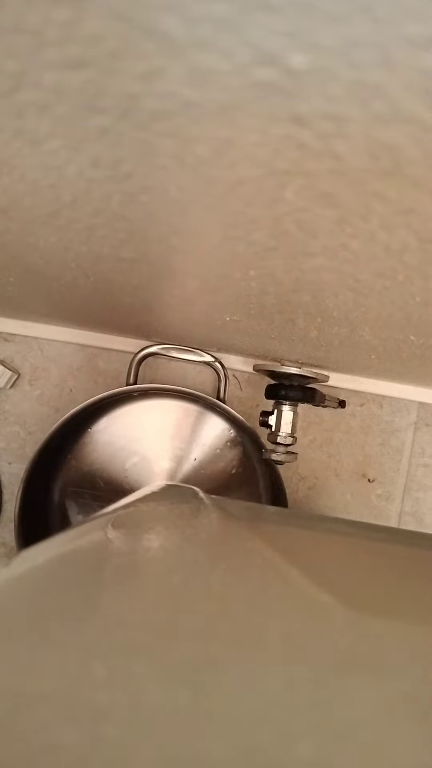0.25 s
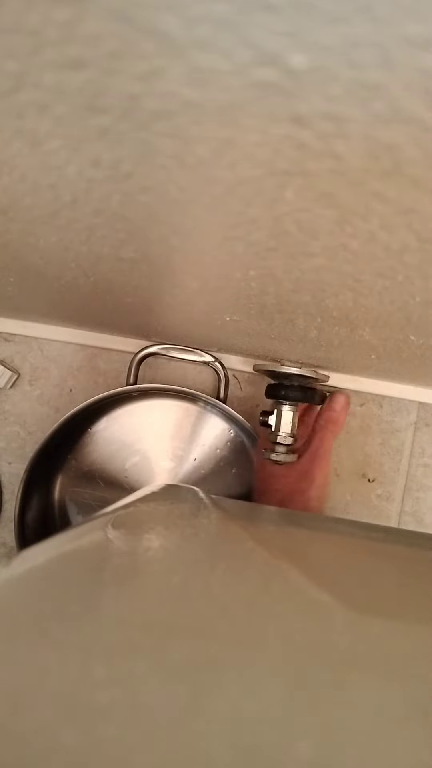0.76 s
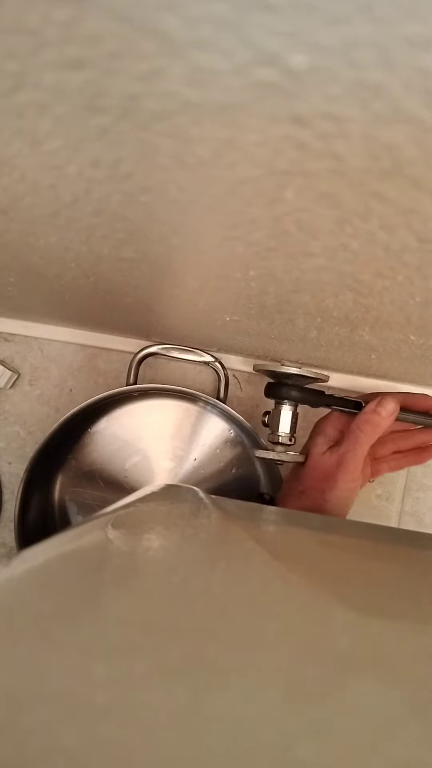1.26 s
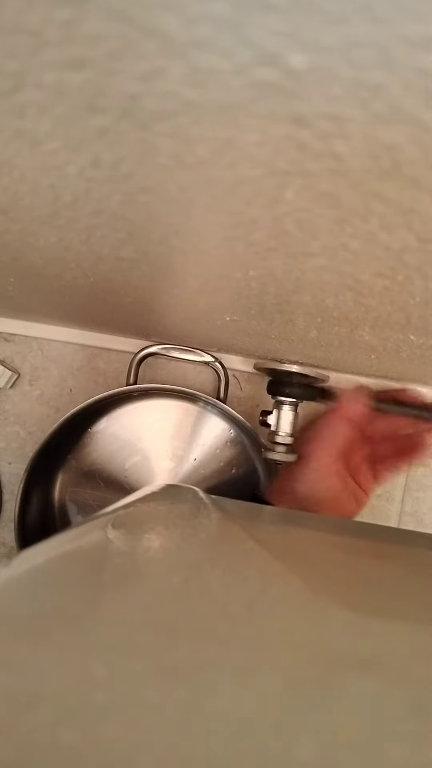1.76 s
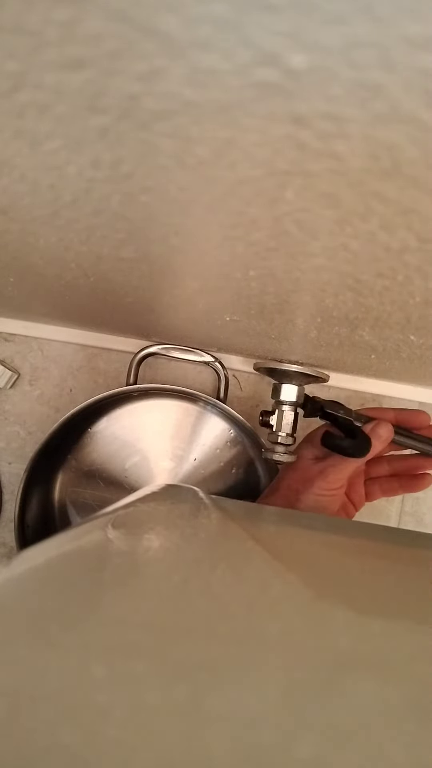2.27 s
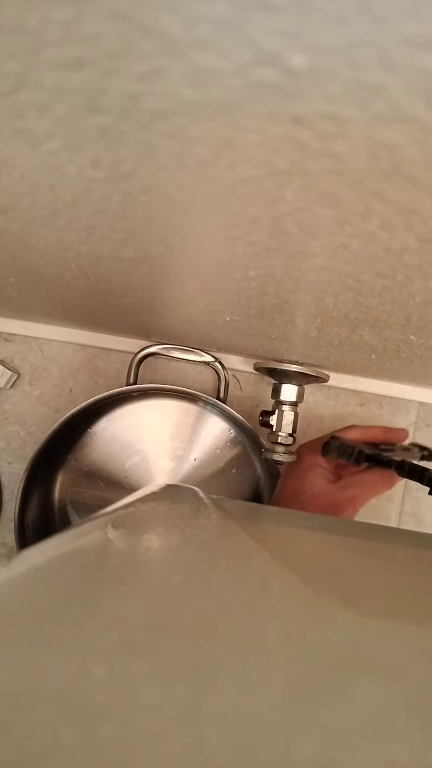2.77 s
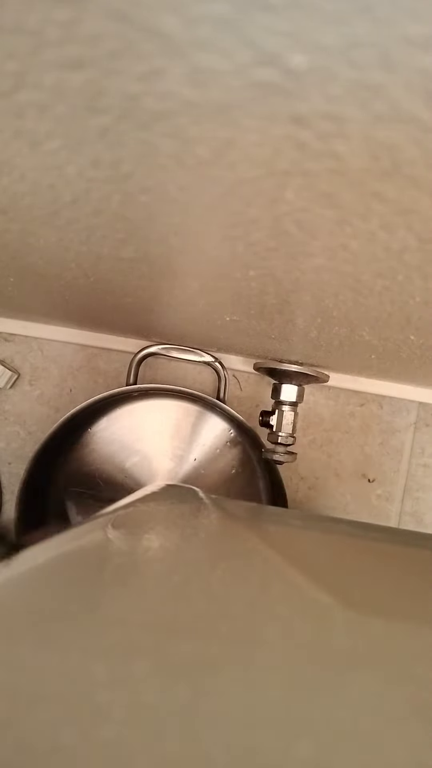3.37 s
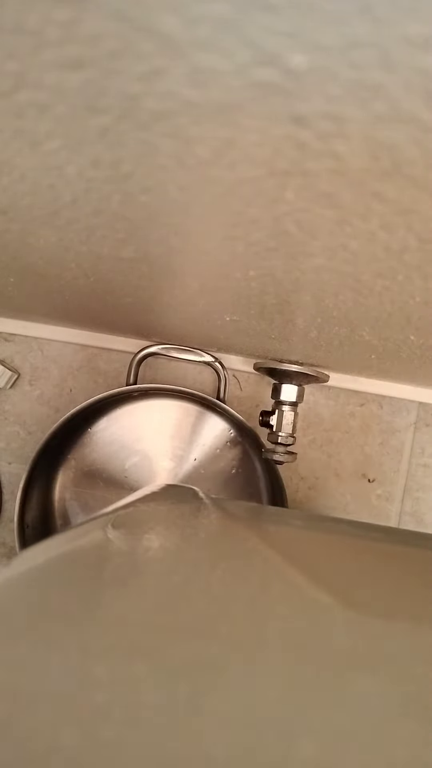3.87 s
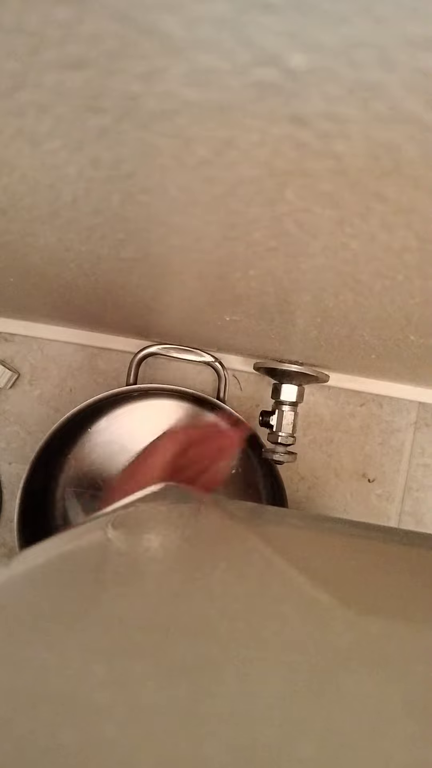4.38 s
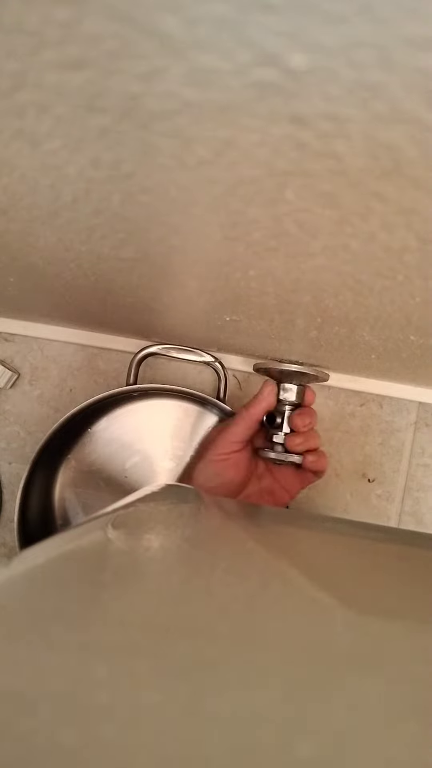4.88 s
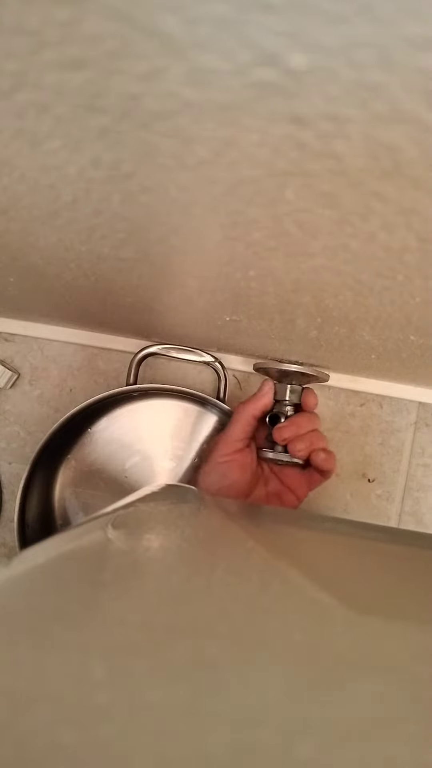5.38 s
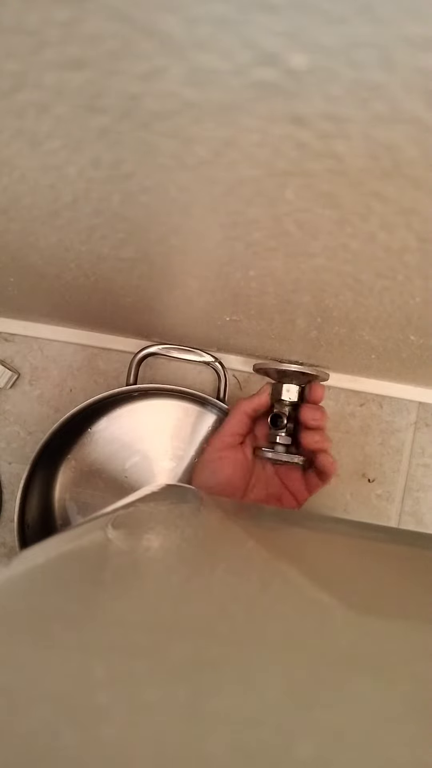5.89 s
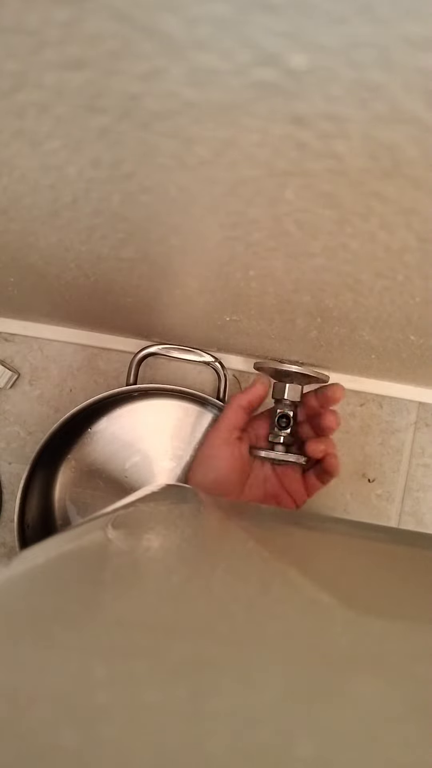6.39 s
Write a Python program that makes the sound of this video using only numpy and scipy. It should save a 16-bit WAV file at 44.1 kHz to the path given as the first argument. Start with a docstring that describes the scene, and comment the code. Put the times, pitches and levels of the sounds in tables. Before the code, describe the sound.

Sparse metal clicks and dull bumps in a small hard room, a loud jumbled clatter of a tool put down, then quiet gritty scrapes.

```python
"""A steel wrench clicks, chatters and knocks on a water valve beside a wall and is laid down among other things.
Each contact is a burst of shaped noise, plus decaying tones of the steel and of the boards and pot it knocks.
All along, dull bumps boom through wall and floor as fading tones and resonant noise; near the end a hand turns
the valve, and gritty noise and thin tones scrape the thread. The echoes of a small hard room are in each blow's
dying away and wavering. Behind it all, a hush of shaped noise swells and sinks."""
import sys
import numpy as np
from scipy import signal
from scipy.fft import rfft, irfft, next_fast_len
from scipy.io import wavfile
from scipy.ndimage import uniform_filter1d, map_coordinates

SR = 44100
rng = np.random.default_rng(int(sys.argv[2]) if len(sys.argv) > 2 else 0)


def store_wav(level_fs):
    """Save 16-bit WAV to argv[1]."""
    pcm = np.round(np.clip(np.atleast_2d(level_fs), -1, 1) * 32767)
    wavfile.write(sys.argv[1], SR, pcm.T.astype(np.int16))


N = 292824  # length [samples]

# A "ring time" is the time a sound takes to fall by 60 dB.
# Background hush, in two stretches: (time [s], hiss level [dB], low rush level [dB])
HUSH_LEVELS = [
    [(0.15, -51.5, -56.5), (0.76, -51, -56), (0.87, -51.5, -58), (0.98, -56.5, -61), (1.16, -59.5, -68),
     (1.4, -57.5, -73), (1.52, -57, -64), (1.79, -54, -61), (1.92, -60, -67), (2.04, -64, -71),
     (2.25, -64.5, -76.5), (2.77, -60.5, -70.5), (3.11, -54.5, -61.5), (3.78, -50.5, -53)],
    [(4.55, -52.5, -65), (4.69, -53, -58), (4.83, -55, -65), (4.97, -60.5, -74), (5.19, -65.5, -79),
     (5.41, -60.5, -70), (5.54, -55.5, -71.5), (5.67, -63, -80), (5.87, -67, -77), (6.2, -55.5, -71.5),
     (6.3, -60, -79), (6.38, -63, -73), (6.49, -68.5, -76), (6.64, -65.5, -79)],
]
# Wavering narrow hum, in two stretches: (time [s], level [dB])
HUM_LEVELS = [
    [(0.15, -64), (0.33, -60), (0.59, -47), (1.28, -73.5), (2.07, -48), (2.31, -62.5), (3.0, -60),
     (3.33, -75.5), (3.65, -53.5), (3.78, -59)],
    [(4.6, -63.5), (4.72, -65), (4.91, -55), (5.35, -45), (5.57, -64.5), (5.71, -52), (5.88, -78.5),
     (6.3, -58), (6.5, -78.5), (6.64, -83)],
]
# Tone color of the hiss: (frequency [Hz], level [dB])
HISS_SPECTRUM = [(180, -24.5), (300, -11), (327, -9.5), (443, -6.5), (559, -12.5), (725, -11), (1030, -12),
                 (1780, -13), (2270, -10), (2820, -11.5), (6910, -16.5), (9500, -35.5), (12400, -62),
                 (20900, -120)]
# Tone color of the faint treble over the hiss: (frequency [Hz], level [dB])
AIR_SPECTRUM = [(4710, -25.5), (8000, -8.5), (9420, -13.5), (10900, -1), (15100, -5.5), (16200, -3),
                (16500, -44.5)]
# Tone color of the deep rumble: (frequency [Hz], level [dB])
RUMBLE_SPECTRUM = [(12, -47.5), (20, -17.5), (101, -7.5), (259, -32.5), (295, -15.5), (325, -14.5),
                   (414, -15), (600, -39.5), (780, -71), (1320, -120)]
# How alike left and right are: (frequency [Hz], likeness [-1 to 1])
STEREO_LIKENESS = [(60, 0.78), (200, .9), (400, .75), (700, 0.62), (1400, 0.062), (4000, 0.14),
                   (12000, -0.048)]
# How the sound leans to one side: (frequency [Hz], left minus right [dB])
STEREO_LEAN = [(60, -0.5), (150, 2.5), (380, 4), (950, 3.5), (2380, 1.5), (5980, -3), (15000, 1)]
# Resonances of wall and floor: (frequency [Hz], width [Hz], level [dB])
WALL_RESONANCES = [(60, 39, -5), (97.4, 48, 0.5), (190, 26, -2), (221, 10, 4), (301.2, 14, -2),
                   (417, 49, -8.5)]
# Dull bumps: (time [s], strength [dB], pitch [Hz])
BUMP_EVENTS = [(0.002, -21, 240), (0.518, -28.5, 167), (0.547, -15.5, 89), (0.619, -29.5, 312),
               (0.688, -23.5, 194.4), (0.758, -26, 197), (0.892, -19.5, 236.5), (0.926, -14.5, 93),
               (1.056, -25.5, 115.4), (1.337, -22, 97), (1.4, -24, 180.5), (1.595, -32, 204),
               (1.687, -25, 178), (1.826, -17.5, 307), (1.849, -5.5, 99.4), (1.878, -8, 98),
               (2.068, -21, 116), (2.133, -12, 187.4), (2.925, -19, 201), (2.976, -17, 189),
               (3.018, -39, 291), (3.82, -12, 224.4), (3.849, -14, 235), (4.146, -9, 333), (4.21, -11, 228),
               (4.301, -22, 218), (4.589, -30.5, 114), (4.841, -31, 221), (5.006, -36.5, 166.3),
               (5.166, -17.5, 157), (5.178, -18, 165.6), (5.219, -29, 160), (5.49, -33, 190),
               (5.522, -25.5, 160), (5.629, -36, 92.4), (5.669, -43.5, 200.6), (5.86, -28, 116),
               (5.948, -37, 202.5), (6.067, -28, 213), (6.149, -17, 99.3), (6.183, -36, 77),
               (6.33, -27.5, 115.5), (6.37, -32, 173), (6.456, -34.5, 127)]
# Resonances of the turning thread: (frequency [Hz], width [Hz], level [dB])
THREAD_RESONANCES = [(1000, 60, -9), (2120, 120, -4), (3100, 400, -2), (3990, 30, -9), (4850, 60, -1),
                     (6650, 70, -6), (7600, 600, 2), (12300, 500, -2), (14900, 1500, 3)]
# Scraping turns: (time of full force [s], scrape level [dB], grip rise [dB per s], hold [s],
#                  whistle time [s], whistle level [dB])
SCRAPING_TURNS = [(5.875, -47, 232, 0.024, 5.878, -54), (6.411, -48.5, 900, 0.067, 6.462, -51.5)]
# Ringing tones of wrench and valve: (frequency [Hz], level [dB], ring time [s])
STEEL_MODES = [(1000, -3, .13), (1300, -3, .15), (1545, -3, .13), (1900, -2, .22), (2130, -3, .17),
               (2350, -2, .17), (2570, 0, .18), (2780, -3, .17), (3420, -2, .16), (3690, 0, .22),
               (3830, 0, .25), (3990, -2, .22), (4320, -2, .18), (4630, 0, .25), (4850, -4, .18),
               (5380, -1, .2), (6350, -5, .17), (6810, -4, .19)]
# Tones of the boards and pot that the blows knock: (frequency [Hz], level [dB], ring time before scaling [s])
BOARD_MODES = [(103, 2.5, .3), (169.6, -1, 0.92), (245.6, -1, 0.77), (289, -13.5, 0.13), (351.6, 6.5, 0.36),
               (369, -1, .2), (417, 1, 0.08), (470.2, -6.5, 0.28), (508.5, -2.5, 0.37), (593.5, -3.5, 0.32),
               (646, -2, .3), (705, -2, 0.32), (757.5, -0.5, 0.18), (833, -3, 0.25), (945, -12.5, 0.39)]
# Tone color of the clatter: (frequency [Hz], level [dB])
CLATTER_SPECTRUM = [(240, -23.5), (400, -10), (482, -1), (1320, -9), (1650, -10.5), (2490, -12),
                    (3120, -11), (3610, -16), (7190, -16.5), (9500, -32), (12400, -86), (20900, -120)]
# Tone color of the clatter's highest part: (frequency [Hz], level [dB])
TOP_SPECTRUM = [(5000, -42.5), (8500, -4.5), (10300, -3), (12500, 1), (13600, -6), (15000, 2),
                (15900, -16.5), (16500, -28.5)]
# How fast the clatter dies at each pitch: (frequency [Hz], share of its ring time [ratio])
CLATTER_DYING = [(400, 1.1), (2000, 0.78), (6000, 0.68), (12000, 1.8)]
# Metal contacts: (time [s], strength [dB], strongest ring [Hz], ring level [dB], strongest knock [Hz],
#                  knock level [dB], dull above [Hz], top level [dB], chatter [s]);
# ring, knock and top levels are relative to the strength
CONTACT_EVENTS = [ (0.002, -18, 1960, 2.5, 556, -3, 6260, -31, .004),
                  (0.012, -29, 5380, 3.5, 390, 8.5, 6900, -45, .005),
                  (0.03, -33.5, 2590, 8, 646, 7.5, 5000, -45, .005),
                  (0.48, -50, 1000, -10, 450, 23.5, 1500, -30, .05),
                  (0.55, -43, 1000, -10, 740, 9.5, 1500, -30, .02),
                  (0.89, -38, 1420, -6, 302, 5.5, 3030, -25, .006),
                  (1.341, -37, 2170, -14, 357, -7, 3430, -32, .006),
                  (1.423, -30, 2760, 4, 486, -2, 3850, -39, .003),
                  (1.576, -40.5, 3400, -3, 350, -17, 4940, -30, .02),
                  (1.596, -31, 2100, -13, 346, -11.5, 5000, -28, 0.0027),
                  (1.692, -11, 3780, 0, 603, -27.5, 9400, -18, .002),
                  (1.808, -37, 6810, 1, 595, -5, 9260, -28, .005),
                  (1.824, -26, 2540, -3, 297, -9, 4930, -23, .03),
                  (1.854, -21, 2530, -13, 510, -7, 7600, -20.5, .006),
                  (2.096, -26, 2360, -9, 590, -0.5, 7050, -24, .04),
                  (2.128, -30.5, 4630, 0.5, 300, 2.5, 7200, -28, 0.013),
                  (2.15, -39.5, 1880, 6, 313, 5.5, 5000, -39, .01),
                  (2.95, -38, 3400, -10, 404, 0, 6000, -40, .004),
                  (2.99, -39.5, 1300, -16, 604, -0.5, 1800, -37, .02),
                  (3.8121, -2.5, 2470, -8, 450, -16, 6600, -40, .02),
                  (3.836, -3, 1280, -8.5, 578, -16, 6820, -29, .025),
                  (3.858, -14.5, 4240, 2, 600, -12, 7190, -35, .01),
                  (3.993, -7, 5900, -21, 400, -0.5, 7000, -24.5, .015),
                  (4.03, -22.5, 3280, 4, 830, -0.5, 4040, -23.5, .045),
                  (4.081, -16.5, 1380, -8.5, 469, -3.5, 3970, -32.5, .03),
                  (4.1156, -10.5, 1370, -11, 406, 1, 7000, -31, .025),
                  (4.1424, -5.5, 4540, -28, 800, -4.5, 8000, -15, .01),
                  (4.165, -7.5, 2420, -6, 350, -1.5, 5120, -24.5, .008),
                  (4.203, -4, 1470, -8.5, 400, -5, 7330, -25, .007),
                  (4.2277, -12, 3500, -2, 341, -1, 7000, -19.5, .008),
                  (4.306, -27.5, 4320, -25, 356, 1.5, 6000, -38, .02),
                  (4.35, -30, 2500, -8, 356, 17, 1520, -35, 0.023),
                  (4.373, -15, 2250, 1.5, 350, -5.5, 6730, -41, 0.0087),
                  (4.3946, -25, 4320, -22, 567, 16.5, 5950, -34, .004),
                  (4.4192, -28, 1910, -9, 610, 9.5, 5000, -30, .008),
                  (4.51, -40, 2350, -10, 645, 9, 4000, -38, .01),
                  (4.667, -10, 2790, -32, 331, -10.5, 4860, -44, .006),
                  (5.174, -47, 1325, -6, 396, 9.5, 2484, -25, 0.0023),
                  (6.076, -47.5, 2130, 8.5, 400, 8.5, 2980, -20, .02),
                  (6.161, -22.5, 2680, 0.5, 437, -4.5, 3930, -24, 0.004),
                  (6.165, -37, 3300, -7, 447, -13, 3600, -31, 0.004), ]

HUM_HZ = 295.9
AIR_DB = -15.5  # treble level relative to the hiss
REST_DB = -67.5  # rubbing level at rest
RUB_DB, RUB_GROWS, RUB_T60_S = -38, 0.85, 0.39  # level after a -20 dB bump; dB per dB of bump; ring time
BUMP_T60_S, BUMP_PAN_DB = .19, 1.5
EASE_DB_PER_S = 284.5  # how fast a scrape lets go
SING_HZ, SING_DB = 4830, -17  # thin tone on the scrape
WHISTLE_HZ, WHISTLE_HOLD_S, WHISTLE_T60_S = 3946, 0.04, .12
CONTACT_T60_S = 0.28
RISE_SHARE, RISE_PER_DB = 0.036, 0.4544  # rise per chatter time at 0 dB; dB of rise time per dB weaker
RING_ROUGH = 1.15  # how much a ring wavers before its level is considered
BAND_LIMIT_HZ = 16350


def amp(db):
    """Turn decibels into a gain."""
    return 10 ** (np.asarray(db) / 20)


def unit(x):
    """Scale x to an average (rms) level of 1."""
    return x / np.sqrt(np.mean(x ** 2) + 1e-20)


def along(points, hz):
    """Read a table of (frequency, value) at hz, joining its points on a log frequency axis."""
    f, v = np.transpose(points)
    return np.interp(np.log(hz + 1), np.log(f + 1), v)


def curves(*tables):
    """Draw one value per sample for each column after the time."""
    s, *cols = np.transpose(np.concatenate(tables))
    return [np.interp(np.arange(N) / SR, s, c) for c in cols]


def wobble(rate):
    """A smooth random curve with rate random points a second."""
    points = rng.standard_normal(int(N * rate / SR) + 4)
    return map_coordinates(points, [np.arange(N) * rate / SR])


def filtered(x, response):
    """Multiply the spectrum of x by a response, which may shift phase as well as level."""
    m = next_fast_len(x.shape[-1] + 1024)
    spectrum = rfft(x, m) * response(np.fft.rfftfreq(m, 1 / SR))
    return irfft(spectrum, m)[..., :x.shape[-1]]


def resonances(peaks):
    """The response of things that vibrate best at given (frequency, width, level) peaks."""
    def response(f):
        total = 0
        for k, (center, width, db) in enumerate(peaks):
            damping = 1j * f * width
            peak = damping / (center * center - f * f + damping + 1e-9)
            total = total + (-1) ** k * amp(db) * peak
        return total
    return response


def shaped(points):
    """Turn a (frequency, level) spectrum into a gain for each frequency."""
    return lambda hz: amp(along(points, hz))


def likeness_angle(hz):
    """The angle whose cosine is the likeness of left and right."""
    return np.arccos(np.clip(along(STEREO_LIKENESS, hz), -1, 1))


def noise(gain, size=N):
    """Stereo noise of average level 1: a shared part plus a part with opposite signs left and right."""
    def split(hz):
        half = likeness_angle(hz) / 2
        return gain(hz) * [np.cos(half), np.sin(half)]
    mid, side = filtered(rng.standard_normal((2, size)), split)
    return unit(np.array([mid + side, mid - side]))


def patchy(x, depth_db):
    """Give x patches of random loudness in time and frequency."""
    z = signal.stft(x, nperseg=512)[2]
    field = rng.standard_normal(z.shape[1:])
    field = uniform_filter1d(field, size=8, axis=0)
    field = uniform_filter1d(field, size=12, axis=1)
    return unit(signal.istft(z * amp(depth_db * unit(field)), nperseg=512)[1][:, :N])


def add(out, s, sound, pan_db):
    """Lay a stereo sound in at time s; a positive pan leans left."""
    part = out[:, max(round(s * SR), 0):][:, :sound.shape[1]]
    part += sound[:, :part.shape[1]] * amp([[pan_db / 2], [-pan_db / 2]])


def hush():
    """Noise shaped into a hiss, a treble that follows it, a low rush, a rumble and a wavering hum."""
    hiss_db, rush_db = curves(*HUSH_LEVELS)
    hiss = amp(hiss_db + 0.5 * wobble(6.6)) * patchy(noise(shaped(HISS_SPECTRUM)), depth_db=2)
    rush = amp(rush_db + 1.0 * wobble(22)) * noise(resonances([(630, 120, 0), (853, 200, -1.1)]))
    treble = amp(hiss_db + AIR_DB + 0.49 * wobble(29)) * noise(shaped(AIR_SPECTRUM))
    hum = amp(curves(*HUM_LEVELS)[0]) * noise(resonances([(HUM_HZ, 5, 0)]))
    rumble = amp(-65.5) * noise(shaped(RUMBLE_SPECTRUM))
    return hiss + rush + treble + hum + rumble


def handling():
    """The weight that settles after each bump rubs the wall, whose resonances sound in uneven lumps."""
    t = np.arange(N) / SR
    weight = amp(REST_DB)
    for s, db, _ in BUMP_EVENTS:
        onset = np.clip((t - s) / 0.01, 0, 1)
        weight = weight + onset * amp(RUB_DB + RUB_GROWS * (db + 20) - 60 * abs(t - s) / RUB_T60_S)
    lumps = amp(0.61 * wobble(25))
    wall = lambda f: resonances(WALL_RESONANCES)(f) / (1 + (f / 480) ** 4)
    return weight * unit(lumps * noise(wall))


def bumps():
    """Soft pushes set wall and floor booming near each bump's pitch: a fading tone plus resonant noise."""
    out, t = np.zeros((2, N)), np.arange(SR // 3) / SR
    for s, db, hz in BUMP_EVENTS:
        lag = rng.normal(0, .12) * np.array([[1], [-1]])  # the tone is shifted oppositely left and right
        tone = np.sin(2 * np.pi * hz * t + lag)

        def near_pitch(f):
            not_above = 1 + (f / (2.0 * hz)) ** 4
            not_below = 1 + (.7 * hz / (f + 1)) ** 4
            return resonances(WALL_RESONANCES)(f) / not_above / not_below
        boom = noise(near_pitch, len(t))
        soft_start = 1 - np.exp(-(t / 0.0039) ** 2)
        fade = amp(db - 6.5 - 60 * t / BUMP_T60_S)
        add(out, s, fade * (tone + 0.61 * boom) * soft_start, BUMP_PAN_DB)
    return out


def thread():
    """Grit under the turning hand excites the valve's resonances, each swelling by itself; the stem whistles."""
    out, t = np.zeros((2, N)), np.arange(N - SR, N) / SR  # only the last second
    vary = lambda rate: wobble(rate)[:SR]
    grit = amp(1.1 * vary(180))
    rub = 0
    for hz, width, db in THREAD_RESONANCES:
        rub = rub + amp(db + 3 * vary(33)) * noise(resonances([(hz, width, 0)]), SR)
    bright = lambda f: (f > 1800) / (1 + (f / 8000) ** 8) + .3 * (f > 10000)
    rub = unit(unit(rub) + .5 * noise(bright, SR))
    sing = amp(SING_DB + 1.8 * vary(50)) * np.sin(2 * np.pi * SING_HZ * t + 1.05 * vary(80))
    force, whistle_level = 0, 0
    for s, db, grip, hold, whistle_s, whistle_db in SCRAPING_TURNS:
        gripping = grip * np.maximum(s - t, 0)
        easing = EASE_DB_PER_S * np.maximum(t - s - hold, 0)
        force = force + amp(db - gripping - easing)
        since = np.maximum(t - whistle_s, 0)
        fade = amp(whistle_db - 60 * np.maximum(since - WHISTLE_HOLD_S, 0) / WHISTLE_T60_S)
        whistle_level = whistle_level + fade * (1 - np.exp(-since / 0.0056))
    whistle = amp(1.5 * vary(40)) * np.sin(2 * np.pi * WHISTLE_HZ * t + 0.64 * vary(60))
    out[:, -SR:] = (grit * rub + sing) * force + whistle_level * whistle
    return out


def ringing(modes, near_hz, dull_hz, spread, t, stretch, rough):
    """Tones close to near_hz take most of a blow; echoes make each waver, mostly differently left and right."""
    hz, db, t60 = np.transpose(modes)[:, :, None]
    distance_db = np.minimum(spread * np.log2(hz / near_hz) ** 2, 17)
    gain = amp(db + rng.normal(0, 1.8, hz.shape) - distance_db) / (1 + (hz / dull_hz) ** 5)
    lag = likeness_angle(hz) * rng.choice([-.5, .5], hz.shape) * [[[1]], [[-1]]]
    # random points 1/150 s apart, joined by straight lines
    tents = np.maximum(1 - abs(150 * t - np.arange(40)[:, None]), 0)
    knots = rng.standard_normal((2, 2, len(hz), 40))  # (phase or level, left or right, tone, point)
    knots[:, 1] = np.where(hz < 550, knots[:, 0], knots[:, 1])  # long waves waver alike on both sides
    turn, swell = knots @ tents * rough * np.minimum(t / .01, 1)
    fade = gain / np.linalg.norm(gain) * amp(3.5 * swell - 60 * t / (t60 * stretch))
    return np.sum(fade * np.sin(2 * np.pi * hz * t + lag + turn), 1)


def clattering(hz, knock_db, dull_hz, chatter, t):
    """A noise burst colored by the steel, damped by the contact; after the chatter each pitch dies by itself."""
    damped = [(mode, .06 * mode, level + rng.normal(0, 4)) for mode, level, _ in STEEL_MODES]
    blurred = resonances(damped)
    thin_hz = 300 * amp(-.55 * knock_db)  # a blow that spares the boards has little bass

    def tint(f):
        near = 1 + 0.36 * np.exp(-3 * np.log2((f + 1) / hz) ** 2)
        steel = .7 + abs(blurred(f))
        dull = 1 + (f / dull_hz) ** 5
        thin = 1 + (thin_hz / (f + 1)) ** 3
        return shaped(CLATTER_SPECTRUM)(f) * near * steel / dull / thin
    f, frames, z = signal.stft(noise(tint, len(t)), SR, nperseg=128)
    t60 = CONTACT_T60_S * along(CLATTER_DYING, f)[:, None]
    z = z * amp(-60 * np.maximum(frames - chatter, 0) / t60)
    return signal.istft(z, SR, nperseg=128)[1][:, :len(t)]


def contacts():
    """Each blow cracks, chatters, rings the steel, knocks the boards and dies in the room."""
    out, t = np.zeros((2, N)), np.arange(SR // 4) / SR
    for s, db, hz, ring_db, knock_hz, knock_db, dull_hz, top_db, chatter in CONTACT_EVENTS:
        clatter = clattering(hz, knock_db, dull_hz, chatter, t)
        crack = 1 + 2.3 * amp(-60 * t / 0.0093)  # the direct sound stands over its echoes
        after = np.maximum(t - chatter, 0)
        top = amp(top_db - 60 * after / 0.094) * noise(shaped(TOP_SPECTRUM), len(t))
        top = top * amp([[3], [-3]])  # leans left
        held = amp(45 * (t - after) / CONTACT_T60_S)  # the chatter keeps the tones fed
        rough = RING_ROUGH * np.clip(1 - .02 * ring_db, .6, 1.4)  # a free ring is purer
        ring = amp(ring_db) * ringing(STEEL_MODES, hz, dull_hz, 500, t, stretch=1, rough=rough)
        knock = ringing(BOARD_MODES, knock_hz, dull_hz, 35, t, stretch=0.9, rough=0.88)
        knock = amp(knock_db + 3) * knock * (1 + 1.28 * amp(-60 * t / 0.17))
        rise = RISE_SHARE * chatter * amp(-RISE_PER_DB * db)  # a weaker blow rises slower
        envelope = (1 - np.exp(-t / rise)) * (1 - (t / t[-1]) ** 6)
        blow = crack * (clatter + top) + held * (ring + knock)
        add(out, s, amp(db - 12.0) * blow * envelope, pan_db=-1)
    return out


def scene():
    """All sources together, left and right."""
    return hush() + handling() + bumps() + thread() + contacts()


def record(dry):
    """Deep bass is lost, the sides lean apart by pitch, peaks round off and the extreme treble is cut."""
    def sides(hz):
        lean = amp(.5 * along(STEREO_LEAN, hz) * [[1], [-1]])
        return lean * (1j * hz / (1j * hz + 48)) ** 3
    deep_noise = amp(-70.5) * noise(lambda hz: 1 / (1 + (hz / 35) ** 4))
    x = filtered(dry, sides) + deep_noise
    x = x / (1 + np.abs(x / .95) ** 6) ** (1 / 6)  # round off the peaks
    return filtered(x, lambda hz: 1 / (1 + (hz / BAND_LIMIT_HZ) ** 200))


dry = scene()
out = record(dry)
store_wav(out)
```